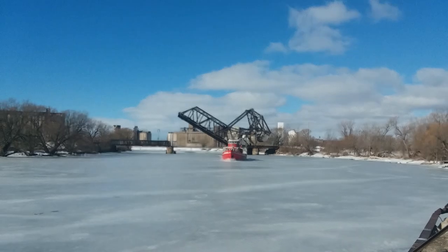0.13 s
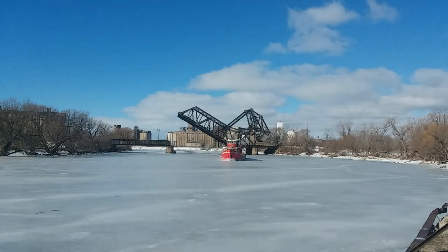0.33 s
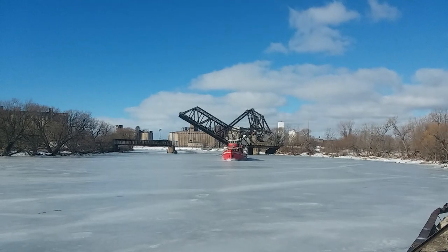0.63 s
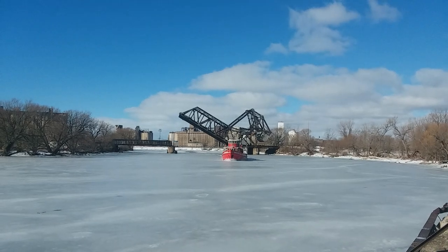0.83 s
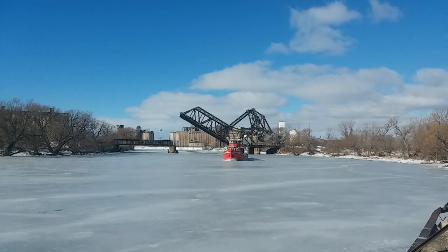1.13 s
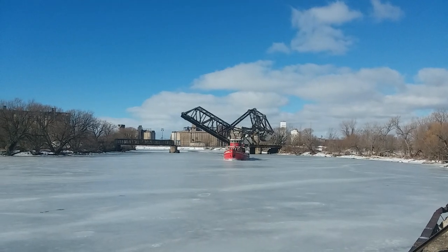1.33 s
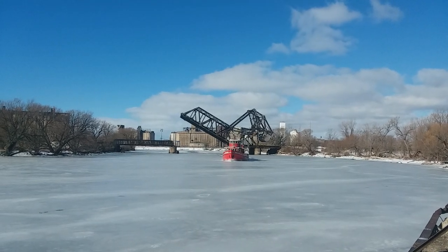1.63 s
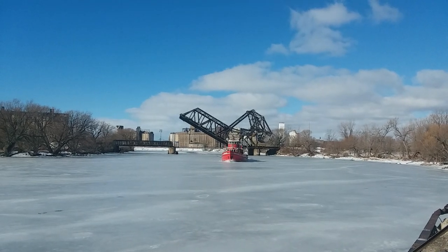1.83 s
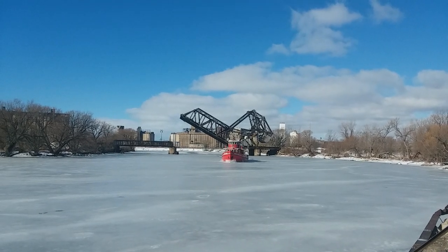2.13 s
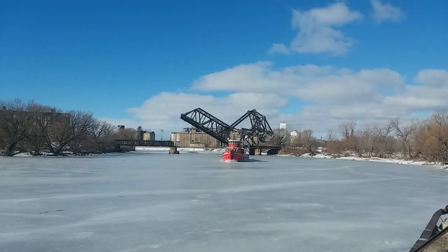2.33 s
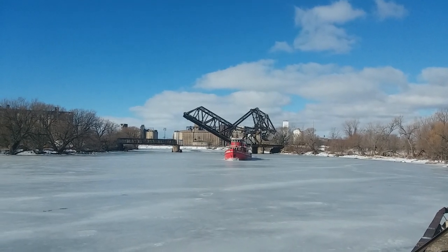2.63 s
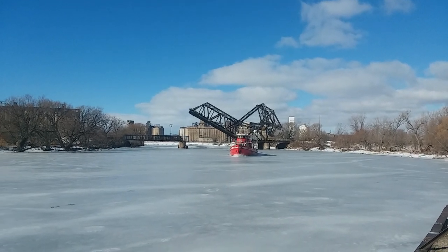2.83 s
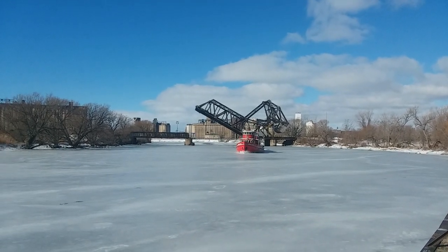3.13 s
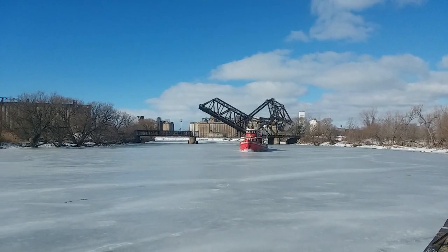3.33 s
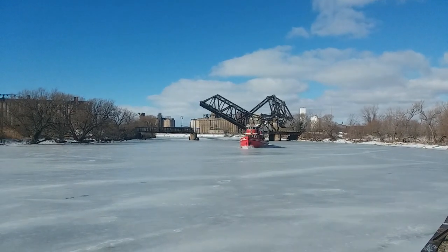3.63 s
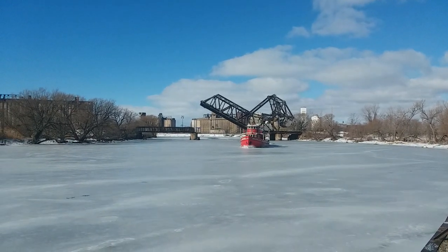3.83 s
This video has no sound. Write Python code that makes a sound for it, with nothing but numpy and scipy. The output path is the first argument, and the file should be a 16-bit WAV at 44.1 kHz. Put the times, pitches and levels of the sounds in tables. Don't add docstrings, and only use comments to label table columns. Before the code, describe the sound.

A distant boat breaks through river ice: gritty grinding, snapping cracks and hull booms over a low engine roar. Light wind thumps unevenly on a stereo outdoor microphone, after a short silent fade-in.

```python
import sys
import numpy as np
from scipy import signal
from scipy.fft import rfft, irfft
from scipy.io import wavfile
from scipy.ndimage import uniform_filter1d

SR = 44100
rng = np.random.default_rng(int(sys.argv[2]) if len(sys.argv) > 2 else 0)


def dump_mix(stems):
    frames = np.atleast_2d(stems).T
    limited = np.clip(frames, -1, 1)
    pcm = np.round(limited * 32767).astype(np.int16)
    wavfile.write(sys.argv[1], SR, pcm)


def linear_from_db(decibels):
    return 10 ** (np.asarray(decibels, float) / 20)


N = 176400

# start_s, crush_db, brightness_db
CRUSH_LEVELS = [(.44, -32.5, -45), (.57, -35.5, -42), (.67, -35, -39), (.76, -33.5, -41.5),
                (1.2, -35.5, -39), (1.51, -35.5, -40.5), (1.65, -32, -36), (2.03, -30.5, -35.5),
                (2.3, -31.5, -39), (2.52, -30, -35), (2.67, -32, -38.5), (2.83, -35.5, -37.5),
                (2.96, -28.5, -39), (3.05, -33.5, -36), (3.14, -30, -38.5), (3.35, -33.5, -37),
                (3.55, -25.5, -39.5), (3.62, -33.5, -38), (3.85, -30.5, -38.5), (4, -31.5, -38)]
AIR_CUT_HZ = 8400


def rms_one(x):
    return x / np.sqrt(np.mean(x ** 2) + 1e-20)


def in_time(rows):
    time_s, *columns = np.transpose(rows)
    return np.array([np.interp(np.arange(N) / SR, time_s, column) for column in columns])


def at_hz(points, hz):
    point_hz, value = np.transpose(points)
    return np.interp(np.log(hz), np.log(point_hz), value)


def drift(rate_hz):
    pole = np.exp(-80 * np.pi * rate_hz / SR)
    noise = rng.standard_normal(N // 40 + 2002)
    slow = signal.lfilter([1], [1, -2 * pole, pole * pole], noise)[2000:]
    return np.interp(np.arange(N) / 40, np.arange(len(slow)), rms_one(slow))


def coloured(x, spectrum, phase=((1, 0), (2, 0))):
    hz = np.fft.rfftfreq(N, 1 / SR) + 1
    response = linear_from_db(at_hz(spectrum, hz)) * np.exp(1j * at_hz(phase, hz))
    return irfft(rfft(x) * response, N)


def patchy(x, top_hz, shared_db, own_db, shared_hz, own_hz):
    hz = np.fft.rfftfreq(N, 1 / SR) + 1
    whole = rfft(x)
    together_db = shared_db * drift(shared_hz)
    out = 0
    for centre_hz in 25 * 2 ** np.arange(0, np.log2(top_hz / 25), .5):
        band = np.cos(np.clip(np.log2(hz / centre_hz), -.5, .5) * np.pi) ** 2
        out = out + irfft(whole * band, N) * linear_from_db(together_db + own_db * drift(own_hz))
    return rms_one(out)


def air_loss(x):
    return signal.sosfilt(signal.butter(20, AIR_CUT_HZ, fs=SR, output="sos"), x)


def drone():
    # start_s, load_db
    load = [(0.62, -32), (0.84, -33.5), (0.87, -29), (0.98, -35), (1.07, -27), (1.15, -34.5), (1.32, -29.5),
            (1.33, -32.5), (2.56, -30), (2.74, -34), (2.99, -27), (3.05, -32.5), (3.11, -27.5),
            (3.36, -32.5), (3.57, -24), (3.59, -28), (3.75, -30.5), (4.0, -30)]
    # freq_hz, level_db
    spectrum = [(35, -33.5), (65, -3.5), (130, -4.5), (210, -3), (320, -13.5), (450, -5.5), (700, -12),
                (1200, -22.5)]
    roar = patchy(coloured(rng.standard_normal(N), spectrum), 2500, 1.12, 1.0, 9.8, 12)
    drone_db = 5
    return linear_from_db(in_time(load)[0] + drone_db) * roar


def grind():
    # freq_hz, level_db
    spectrum = [(200, -5.5), (2000, -0.5), (2650, -6.5), (3100, -17.5), (3700, -13), (4350, -23.5),
                (4800, -38), (7000, -35.5)]
    grains_per_s, grain_spread_db, grain_share = 900, 3.0, .3
    size_db = grain_spread_db * np.minimum(rng.exponential(1, N), 5)
    sizes = linear_from_db(size_db) * rng.choice([-1, 1], N)
    breaks = rng.random(N) < grains_per_s * linear_from_db(5 * drift(10)) / SR
    grains = rms_one(sizes * breaks)
    mix = np.sqrt(grain_share) * grains + np.sqrt(1 - grain_share) * rng.standard_normal(N)
    grinding = patchy(coloured(mix, spectrum), 14000, 1.6, 0.93, 7.7, 16)
    ice_db = 2.5
    return linear_from_db(in_time(CRUSH_LEVELS)[0] + ice_db) * grinding


def scatter():
    # freq_hz, level_db
    spectrum = [(300, -3), (600, -2.5), (1800, -3), (3000, -15), (4000, -23.5), (4700, -39.5), (6000, -35),
                (8100, -40)]
    scatter_db, follows_crush = -42.5, 0.93
    crush_db = in_time(CRUSH_LEVELS)[0]
    wash = rms_one(coloured(rng.standard_normal((2, N)), [(100, -38.5)] + spectrum))
    return linear_from_db(scatter_db + follows_crush * (crush_db - crush_db.mean())) * air_loss(wash)


def wind():
    # start_s, left_db, right_db
    levels = [(.45, -32.5, -31.5), (.6, -34.5, -31.5), (.85, -35.5, -29), (1.15, -39.5, -40),
              (1.45, -41, -39), (1.7, -31.5, -30), (2.0, -27.5, -32), (2.3, -29, -36.5), (2.6, -33, -32),
              (2.85, -42, -38.5), (3.05, -32.5, -42), (3.3, -22.5, -33), (3.55, -31, -34), (3.75, -33, -38),
              (4, -41, -45)]
    # freq_hz, level_db
    spectrum = [(25, -30), (50, -8), (80, 0), (130, 0), (200, -3), (300, -7), (450, -20), (900, -45)]
    lumps = [patchy(coloured(rng.standard_normal(N), spectrum), 1000, 3, 1.2, 22, 8) for port in range(2)]
    return linear_from_db(in_time(levels)) * lumps


def cracks():
    # start_s, peak_db
    events = [(.556, -26), (.594, -14), (.629, -21), (.718, -14), (.731, -19), (.742, -15), (.758, -18),
              (.772, -16), (1.019, -22), (1.29, -21), (1.346, -22), (1.471, -20), (1.519, -21),
              (1.595, -20), (1.699, -18), (1.776, -17), (1.888, -19), (1.918, -18), (2.025, -12),
              (2.12, -15), (2.205, -21), (2.322, -21), (2.417, -13), (2.56, -18), (2.609, -20),
              (2.677, -16), (2.706, -16), (2.787, -21), (2.832, -22), (2.89, -18), (2.93, -17),
              (3.107, -19), (3.619, -20), (3.711, -20), (3.81, -21), (3.861, -20)]
    crack_db, low_hz, high_hz = 25, 500, 2100
    time_s, peak_db = np.transpose(events)
    clicks = np.zeros(N)
    clicks[(time_s * SR).astype(int) + 20] = linear_from_db(peak_db + crack_db)
    band = signal.butter(4, [low_hz, high_hz], "band", fs=SR, output="sos")
    return signal.sosfilt(band, clicks + 1e-18)


def buffets():
    # start_s, pitch_hz, left_db, right_db
    events = [(0.598, 219, -16, -14), (0.649, 184, -21, -21.5), (0.732, 123, -15.5, -21.5),
              (0.854, 164, -12, -14), (0.899, 192, -21, -17.5), (0.937, 172, -17, -19),
              (0.994, 166, -17, -21), (1.047, 140, -20, -22), (1.101, 185, -10.5, -13),
              (1.22, 135, -36.5, -8.5), (1.255, 132, -18.5, -20.5), (1.281, 126, -16.5, -16),
              (1.396, 157, -17.5, -13.5), (1.456, 204, -28, -25), (1.567, 145, -19, -28),
              (1.628, 145, -13, -27), (1.693, 153, -3.5, -32), (1.753, 177, -8, -23),
              (1.824, 183, -20, -22), (1.887, 154, -8.5, -34), (1.955, 161, -8.5, -43),
              (1.988, 136, -9.5, -25), (2.017, 178, -6, -28), (2.103, 138, -6, -32),
              (2.259, 164, -15, -18.5), (2.287, 180, -19.5, -20), (2.375, 130, -14, -16.5),
              (2.421, 111, -27, -25.5), (2.478, 151, -25, -23), (2.521, 173, -11.5, -39),
              (2.594, 168, -17.5, -31), (2.917, 201, -21, -22), (2.972, 193, -14.5, -14.5),
              (3.004, 213, -16, -19.5), (3.074, 156, -17, -22), (3.118, 131, -27.5, -18.5),
              (3.177, 188, -15, -39), (3.259, 119, -4.5, -23.5), (3.288, 185, -13, -35),
              (3.338, 134, -28, -10), (3.452, 179, -14, -13), (3.538, 158, -25.5, -24),
              (3.565, 157, -17, -20), (3.625, 142, -21, -25), (3.683, 138, -22, -19.5),
              (3.832, 183, -18, -17), (3.889, 184, -16, -13.5), (3.954, 169, -24, -21)]
    length_cycles, buffet_db, port_turn_rad_per_db = .8, -1.2, .3
    t = np.arange(-1500, 1500) / SR
    out = np.zeros((2, N))
    turns = rng.random(len(events))
    for (time_s, hz, left_db, right_db), turn in zip(events, turns):
        port_turn = port_turn_rad_per_db * (left_db - right_db) * np.array([[0], [1]])
        swell = np.exp(-(t * hz / length_cycles) ** 2)
        thump = swell * np.sin(2 * np.pi * (hz * t + turn) + port_turn)
        first = int(time_s * SR) - 1550
        out[:, first:first + 3000] += linear_from_db(buffet_db + np.array([[left_db], [right_db]])) * thump
    return out


def booms():
    # start_s, length_s, level_db
    rams = [(0.652, 0.077, -32), (0.881, 0.11, -27.5), (1.105, 0.037, -30.5), (1.373, 0.13, -33),
            (1.633, 0.013, -29.5), (2.3, 0.055, -23), (2.502, 0.019, -23), (3.003, 0.088, -21.5),
            (3.455, 0.08, -23), (3.597, 0.019, -33.5), (3.869, 0.073, -27)]
    low_hz, high_hz = 165, 270
    band = signal.butter(2, [low_hz, high_hz], "band", fs=SR, output="sos")
    low = signal.sosfilt(band, rng.standard_normal(N))
    even = low / np.sqrt(uniform_filter1d(low ** 2, size=1200))
    t = np.arange(N) / SR
    swells = [linear_from_db(db - 2.5) * np.exp(-((t - time_s) / length_s) ** 2) for time_s, length_s, db in rams]
    return even * sum(swells)


def bird():
    start_s, length_s, pitch_hz, rise_hz_per_s, peep_db = .68, .02, 8150, 8000, -66
    t = np.arange(N) / SR - start_s
    tone = np.sin(2 * np.pi * (pitch_hz + rise_hz_per_s * t / 2) * t)
    return linear_from_db(peep_db) * np.exp(-(t / length_s) ** 2) * tone * [[.3], [1]]


def over_the_ice(x):
    # centre_hz, width_hz, depth_db
    dips = [(830, 150, -3), (1720, 250, -5), (2310, 220, -9), (2960, 250, -10), (3380, 250, -14),
            (4060, 220, -14), (4600, 300, -10), (5320, 250, -7), (6130, 300, -10), (6690, 250, -10),
            (7230, 250, -9), (7800, 500, -8), (8550, 400, -10), (9150, 400, -6)]
    for hz, width_hz, depth_db in dips:
        a = np.pi * width_hz / SR
        c = -2 * np.cos(2 * np.pi * hz / SR)
        g = linear_from_db(depth_db / 2)
        x = signal.lfilter([1 + a * g, c, 1 - a * g], [1 + a / g, c, 1 - a / g], x)
    return air_loss(x)


def at_ports(boat):
    # freq_hz, left_re_right_db
    level = [(500, 0), (1800, -4), (3150, -4), (3700, -2), (4950, 13.5), (5500, 5), (6500, -2), (8000, 0)]
    # freq_hz, left_re_right_rad
    phase = [(200, .2), (600, 0), (2700, 0), (4400, 2), (4800, -1.5), (5500, -3), (7000, -6.2),
             (8200, -7.3)]
    return np.array([coloured(boat, level, phase), boat])


def brighten(x):
    bright_hz = 5400
    sheen_db, sheen_hz, sheen_width_hz, sheen_swing = -81.5, 12000, 2000, 1.3
    crush_db, bright_db = in_time(CRUSH_LEVELS)
    low = signal.sosfiltfilt(signal.butter(3, bright_hz, fs=SR, output="sos"), x)
    edges_hz = [sheen_hz - sheen_width_hz / 2, sheen_hz + sheen_width_hz / 2]
    band = signal.butter(2, edges_hz, "band", fs=SR, output="sos")
    sheen = rms_one(signal.sosfilt(band, rng.standard_normal(N)))
    swing_db = crush_db + bright_db - np.mean(crush_db + bright_db)
    treble = linear_from_db(bright_db - bright_db.mean()) * (x - low)
    return low + treble + linear_from_db(sheen_db + sheen_swing * swing_db) * sheen * [[1], [0]]


def scene():
    boat = over_the_ice(drone() + grind() + cracks() + booms())
    return brighten(at_ports(boat) + scatter()) + wind() + buffets() + bird()


def roll_off(x):
    return signal.sosfilt(signal.butter(12, 15720, fs=SR, output="sos"), x)


def record(dry):
    low_cut_hz, hiss_db, whine_hz, whine_db = 51, -74.3, 14000, -97
    start_s, fade_s, fade_bend, end_tick_db = 0.37, 0.27, 0.97, -24
    t = np.arange(N) / SR
    x = signal.sosfilt(signal.butter(4, low_cut_hz, "high", fs=SR, output="sos"), dry)
    x = x + linear_from_db(hiss_db) * rng.standard_normal((2, N))
    x = x + linear_from_db(whine_db) * np.sin(2 * np.pi * whine_hz * t)
    fade = np.clip((t - start_s) / fade_s, 0, 1) ** fade_bend
    end_tick = linear_from_db(end_tick_db) * np.exp((t - t[-1]) / 1e-4)
    return roll_off(x * fade + end_tick)


dry = scene()
out = record(dry)
dump_mix(out)
```